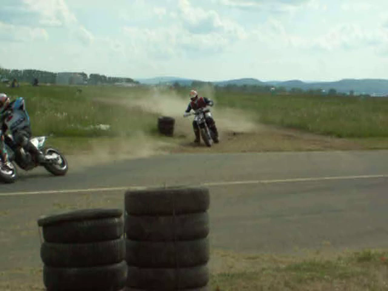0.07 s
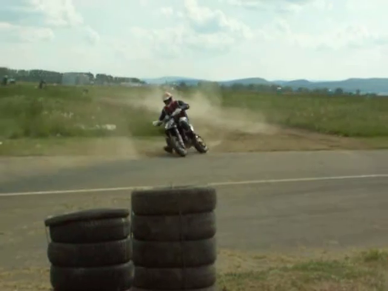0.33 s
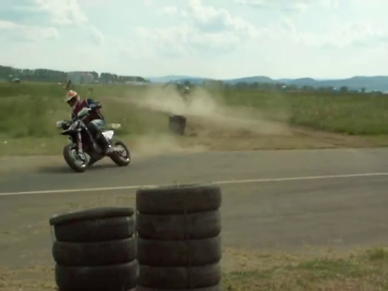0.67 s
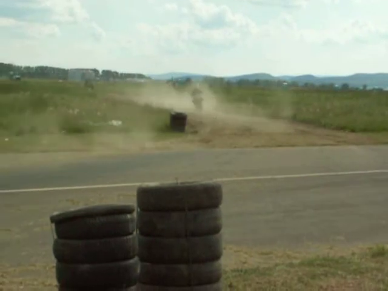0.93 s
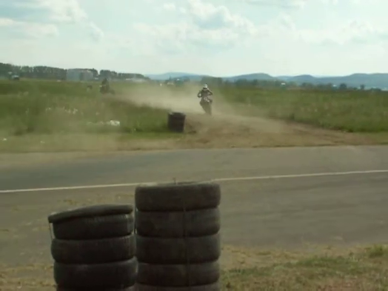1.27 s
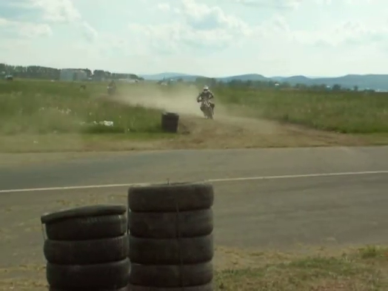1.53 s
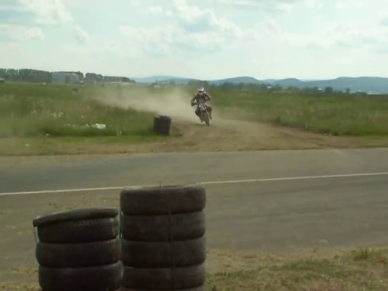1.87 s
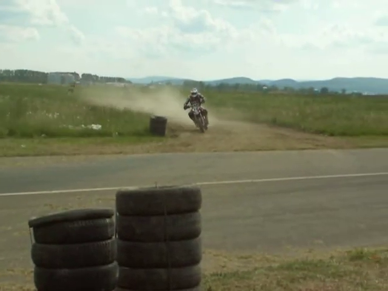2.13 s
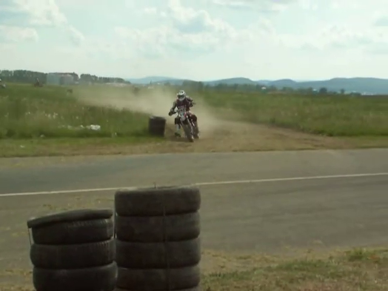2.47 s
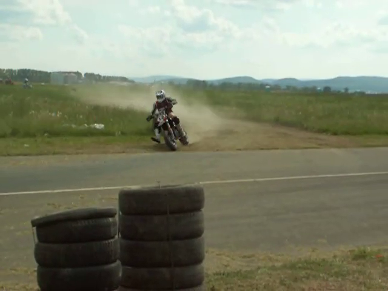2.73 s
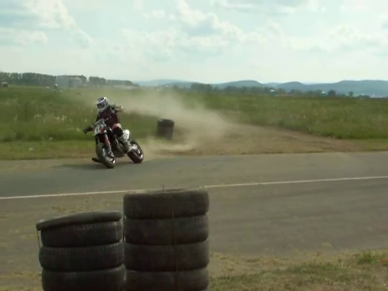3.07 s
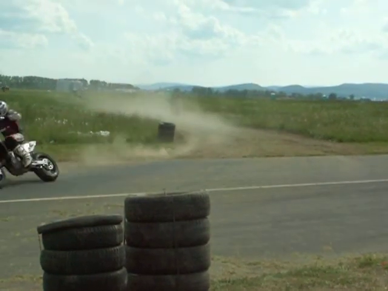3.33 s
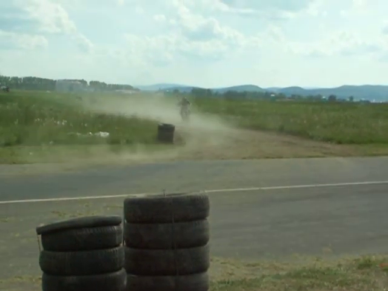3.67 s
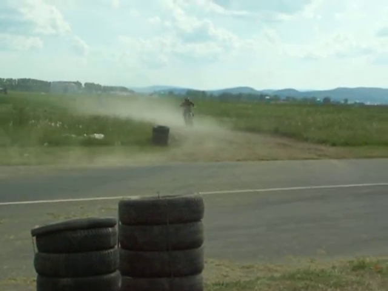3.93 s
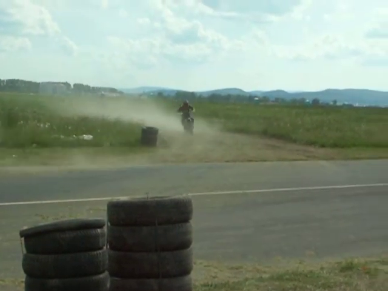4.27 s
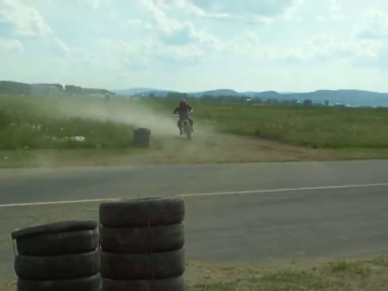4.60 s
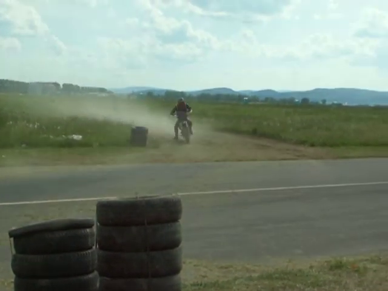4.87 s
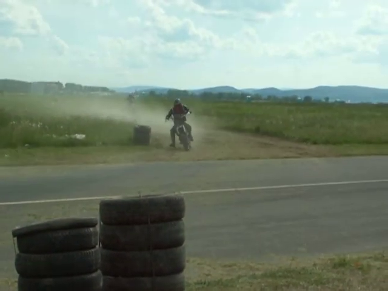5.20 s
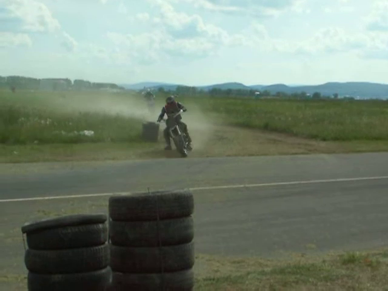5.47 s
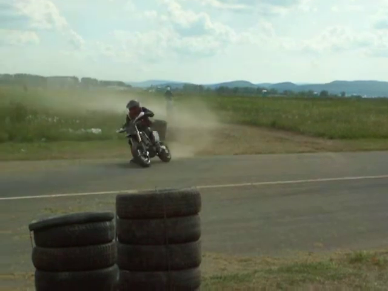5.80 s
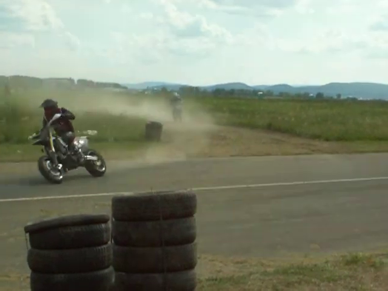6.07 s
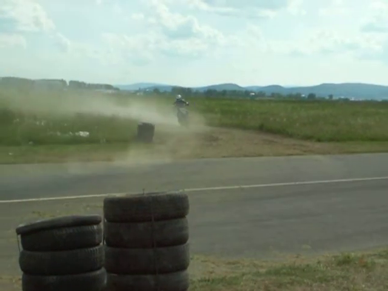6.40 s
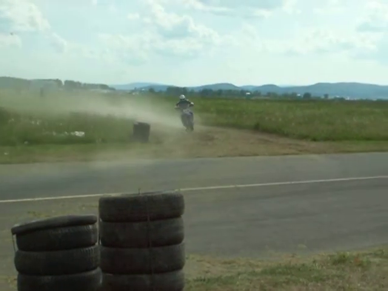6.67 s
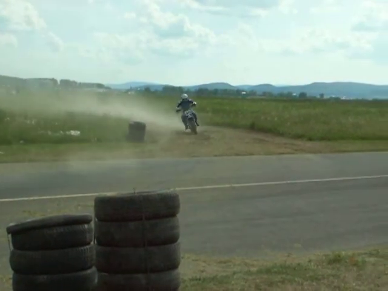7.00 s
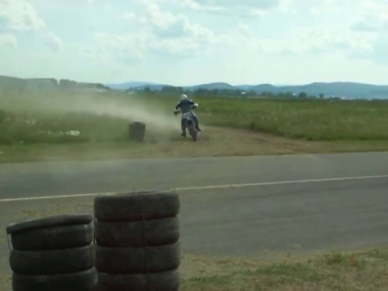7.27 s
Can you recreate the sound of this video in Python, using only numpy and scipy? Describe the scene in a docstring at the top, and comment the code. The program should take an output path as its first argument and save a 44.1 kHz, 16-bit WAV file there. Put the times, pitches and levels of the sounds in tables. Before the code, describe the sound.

Outdoors beside a track, two loud motorcycles accelerate past in quick succession and pull away. A third coasts into the bend with uneven popping, sharp exhaust bangs and brief, faint tyre squeals, then revs off. A fourth follows with a rapid volley of backfires before accelerating hard. Tyres rustle over grit throughout, all heard through a small, close microphone with muffled treble and slight distortion.

```python
"""Trackside at a bend after a dirt section, on a small camera's microphone close to the passing bikes.
Four single-cylinder four-stroke motorcycles come off the dirt, burble round and accelerate away.
Under throttle each firing booms in the pipe, barks and rings the silencer; off throttle the engines
pop unevenly and unburnt fuel bangs. Tyres squeal in the bend and grit hisses under them.
The microphone overloads a little and keeps almost nothing above 4 kHz."""
import sys
import numpy as np
from scipy import signal
from scipy.fft import rfft, irfft
from scipy.io import wavfile

SR = 44100
rng = np.random.default_rng(int(sys.argv[2]) if len(sys.argv) > 2 else 0)


def store_pcm(level_fs):
    """Save levels as 16-bit WAV."""
    pcm = np.round(np.clip(level_fs, -1, 1) * 32767).astype(np.int16)
    wavfile.write(sys.argv[1], SR, np.atleast_2d(pcm).T)


N = 332073
T = np.arange(N) / SR

# when each bike is nearest the microphone: t/s
NEAREST_S = [.14, .99, 3.45, 6.27]
# spectrum of tyres on grit: f/Hz, level/dB
GRIT_SPECTRUM = [(25,-18),(55,-6.5),(120,0.5),(300,9.5),(600,0.5),(1000,2.5),(1500,-2.5),(2800,-8.5),(3500,-6.5),(4300,-12)]
# tyre squeals: start t/s, length t/s, pitch f/Hz, level/dB
TYRE_SQUEALS = [(2.508,0.27,908,-25),(2.848,.38,874,-25),(6.17,.25,925,-26)]
# throttle shut for the bend or a gear change:
# shut t/s, pick-up t/s, driving again t/s, starting firing rate f/Hz, sag/(Hz/s), mid-coast level/dB
THROTTLE_OFF = [(.1,0.191,0.38,47.9,14,-36),(1.319,1.499,1.533,90.17,35,-20.5),(2.179,3.118,3.38,70,41,-22),(4.68,5.622,5.98,71.3,28,-20.5),(6.724,6.87,6.75,74.1,90,-16)]
# spectrum of a pop through the silencer: f/Hz, level/dB
POP_SPECTRUM = [(25,-30.5),(60,-13.5),(100,-2),(150,0.5),(300,0.5),(450,-4),(700,-9.5),(1200,-22.5),(2000,-19),(3000,-36),(4200,-42.5)]
# loud bangs of unburnt fuel: t/s, level/dB
FUEL_BANGS = [(2.525,-8),(2.604,2.5),(2.745,-9.5),(2.961,-14),(3.111,-12),(3.174,-11.5),(3.276,-7.5),(4.702,-5.5),(4.932,-12.5),(5.427,-4.5),(5.917,-11.5)]
# spectrum of a bang at the mouth of the pipe: f/Hz, level/dB
BANG_SPECTRUM = [(30,-27),(90,-7),(170,2),(400,0),(800,-5),(1700,-11),(2600,-18),(4200,-27)]
# the pipe's standing waves heard from the side: f/(main resonance), level/dB
PIPE_SIDE = [(.42,-29.5),(.58,-31.5),(.7,-22),(.84,-22.5),(.97,-15),(1.1,-21),(1.3,-22.5),(1.7,-36.5)]
# and from behind: f/Hz, level/dB
PIPE_REAR = [(100,-26),(147,-20.5),(165,-20),(215,-25.5),(245,-18),(298,-30),(345,-27.5),(380,-19),(420,-27)]
# spectra of the exhaust's bark and hiss: f/Hz, level/dB
BARK_SPECTRUM = [(100,-38.5),(340,-12.5),(450,8.5),(560,12.5),(700,1),(850,2),(1100,-1.5),(1350,2.5),(1700,2.5),(2400,-8),(4300,-56.5)]
HISS_SPECTRUM = [(100,-36),(900,-27),(1800,-14.5),(2600,6),(3050,-3.5),(3550,3.5),(3900,-6),(4300,-8)]
# each bike under throttle: t/s, firing rate f/Hz, exhaust level/dB re full drive
# a sudden fall in rate is a gear change
DRIVE_1 = [(.08,69.5,-16),(.32,73.6,-10.5),(.46,77.7,-5),(.6,81.4,-3.5),(.72,83,0),(.85,88,-0.5),(1.07,80,-1.5),(1.3,84,-9)]
DRIVE_2 = [(.88,71.9,-16),(1.05,77.64,-19),(1.2,82.76,-1),(1.48,89.26,1),(1.57,73.82,2.5),(1.84,76.08,1.5),(2.19,81.08,-6),(2.3,69.8,-22.5),(2.55,58,-33.5)]
DRIVE_3 = [(3.17,46.49,-33),(3.32,54.03,-21.5),(3.5,60.52,-6.5),(3.8,65.73,-2),(4.1,69.3,0),(4.4,73.22,0.5),(4.68,75.82,-5),(4.79,73.2,-18)]
DRIVE_4 = [(5.6,48.33,-22.5),(5.94,54.93,-15),(6.22,63.67,-7),(6.5,72.2,-3),(6.7,79.2,1),(6.81,62.28,-11),(6.9,64.74,-0.5),(7.16,70.98,3),(7.62,77.14,-5.5)]


def undb(db):
    """Decibels to gain."""
    return 10 ** (np.asarray(db) / 20)


def unit(x):
    """Scale to rms 1."""
    return x / np.sqrt(np.mean(x ** 2))


def envelope(start_s, end_s, attack_s, release_s):
    """Rise from the start, hold, and fall to nothing at the end."""
    return np.clip(np.minimum((T - start_s) / attack_s, (end_s - T) / release_s), 0, 1)


def wander(rate_hz):
    """Random drift with a spread near 1."""
    return np.interp(T * rate_hz, np.arange(4096), rng.standard_normal(4096))


def colour(x, spectrum, size=4096):
    """Minimum-phase filter from a table of f/Hz, level/dB."""
    hz, db = np.transpose(spectrum)
    bins_hz = np.arange(size // 2 + 1) * SR / size
    gain = undb(np.interp(np.log(bins_hz + 1), np.log(hz), db))
    cepstrum = irfft(np.log(gain))
    cepstrum[1:size // 2] *= 2
    cepstrum[size // 2 + 1:] = 0
    return signal.oaconvolve(x, irfft(np.exp(rfft(cepstrum))))[:N]


def resonate(x, hz, width_hz):
    """One resonance, gain 1 at its centre."""
    return signal.lfilter(*signal.iirpeak(hz, hz / width_hz, fs=SR), x)


def clicks(times, sizes):
    """Impulses, each shared between its two nearest samples."""
    at = np.clip(times * SR, 0, N + 1)
    i = at.astype(int)
    early = np.bincount(i, sizes * (1 - at + i), N + 3)
    late = np.bincount(i + 1, sizes * (at - i), N + 3)
    return (early + late)[:N]


def firings(cycle, scatter_db, jitter_s, count=800):
    """One impulse per engine cycle, each a little off in time and size."""
    timing, strength = rng.standard_normal((count, 2)).T
    times = np.interp(np.arange(count), cycle, T, left=-1, right=T[-1] + 1) + jitter_s * timing
    return clicks(times, undb(scatter_db * np.clip(strength, -2, 1.5)) * (times > 0))


def puffs(pulses, decay_s):
    """Turbulent gas that dies away after each impulse."""
    flow = signal.lfilter([1], [1, -np.exp(-1 / (decay_s * SR))], pulses)
    return unit(flow * rng.standard_normal(N))


def ground(x, lag_s, drift, share):
    """Add the reflection off the ground; its lag drifts as the bike moves and bounces."""
    lag = lag_s * (1 + drift * wander(4))
    return x + share * np.interp(T - lag, T, x)


def grit(circuit_db=-27, passing_db=-21.5, attack_s=.3, hold_s=.88, release_s=.55):
    """Tyres roll over grit: a fluttering bed from the whole circuit that swells with each pass."""
    passes = [envelope(s - attack_s, s + hold_s + release_s, attack_s, release_s) for s in NEAREST_S]
    gain = np.hypot(undb(circuit_db), undb(passing_db) * np.max(passes, axis=0))
    return gain * undb(1.4 * wander(35)) * unit(colour(rng.standard_normal(N), GRIT_SPECTRUM))


def squeal(start_s, length_s, hz, db, droop=.051):
    """Rubber sticks and slips in the bend; the pitch droops as the tyre grips again."""
    progress = np.clip((T - start_s) / length_s, 0, 1)
    pitch_hz = hz * (1 - droop * progress ** 3) * (1 + .022 * wander(170))
    angle = 2 * np.pi * np.cumsum(pitch_hz) / SR
    sliding = envelope(start_s, start_s + length_s, attack_s=.076, release_s=.11)
    return sliding * undb(db + 4.4 * wander(60)) * (np.sin(angle) + .06 * np.sin(2 * angle))


def coasting(idle_hz=47.14, pickup_hz_per_s=23, swell_db=8.5):
    """Firing rate, gain and progress (0-1) of the coasts: revs sag towards idle, then pick up."""
    hz, gain, progress = np.full(N, idle_hz), np.zeros(N), np.zeros(N)
    for shut_s, pickup_s, drive_s, start_hz, sag, db in THROTTLE_OFF:
        elapsed = T - shut_s
        revs = np.maximum(start_hz - sag * elapsed, idle_hz)
        revs += pickup_hz_per_s * np.maximum(T - pickup_s, 0)
        hz = np.where(elapsed >= 0, revs, hz)
        progress = np.where(elapsed >= 0, np.minimum(elapsed / (drive_s - shut_s), 1), progress)
        approach = undb(db + swell_db * (progress - .5))  # louder as the bike comes nearer
        gain += approach * envelope(shut_s, drive_s + .05, attack_s=.05, release_s=.1)
    return hz, gain, progress


def overrun(lean_at=.58, side_db=-1.5):
    """Weak, uneven firings stir the pipe's resonances; the deepest fades as the bike turns side-on."""
    hz, gain, progress = coasting()
    cycle = np.cumsum(hz) / SR
    pulses = firings(cycle, scatter_db=3, jitter_s=.00035)
    gulps = firings(cycle + .4, scatter_db=2.5, jitter_s=.0005)
    gas = unit(pulses - .55 * gulps) + .68 * puffs(pulses, .011)
    side_on = np.clip((progress - lean_at) * 10 + .5, 0, 1)
    pipe = gas + .68 * resonate(gas, 235, 25) + .7 * resonate(gas, 322, 40)
    pipe += 2 * (1 - side_on) * resonate(gas, 164.5, 44) + .74 * side_on * resonate(gas, 800, 400)
    # unburnt fuel crackles in the header, far more unevenly than the firings
    sparks = firings(cycle, scatter_db=8, jitter_s=.0008)
    crackle = unit(resonate(puffs(sparks, .0018), 1900, 2400))
    return gain * undb(side_db * side_on) * (unit(colour(pipe, POP_SPECTRUM)) + undb(-24) * crackle)


def backfires(volley_s=5.49, volley_hz=49.1, count=11):
    """Fuel bangs in the exhaust, singly and in one volley at idling rate; a puff of gas trails each."""
    times, db = np.transpose(FUEL_BANGS)
    volley_db = -7.5 + 2.5 * rng.standard_normal(count)
    volley = clicks(volley_s + np.arange(count) / volley_hz, undb(volley_db))
    pulses = clicks(times, undb(db)) + volley
    bangs = colour(pulses + .75 * pulses.std() * puffs(pulses, .005), BANG_SPECTRUM)
    return bangs / np.abs(colour(signal.unit_impulse(N), BANG_SPECTRUM)).max()


def pipe_level(hz, pipe_hz, away):
    """Level/dB of the pipe's standing waves as the bike turns from side-on (0) to tail-on (1)."""
    side = np.interp(hz / pipe_hz, *np.transpose(PIPE_SIDE))
    rear = np.interp(hz, *np.transpose(PIPE_REAR))
    return (1 - away) * side + away * rear


def pipe_boom(cycle, overtones_db, lead_cycles=.19, waver_db=1.9):
    """Low standing waves of the pipe, locked to the firings; the fundamental radiates poorly."""
    angle = 2 * np.pi * (cycle + lead_cycles + .006 * wander(60))
    harmonics = enumerate([overtones_db[0] - 13.5, *overtones_db], 1)
    return -np.sqrt(2) * sum(undb(db + waver_db * wander(30)) * np.sin(k * angle) for k, db in harmonics)


def silencer_ring(strike, nearest_s, rear_hz, width_hz):
    """The silencer rings briefly after each crack, lower from the side than from behind."""
    side, rear = (unit(resonate(resonate(strike, hz, width_hz), hz, 1.47 * width_hz))
                  for hz in (.83 * rear_hz, rear_hz))
    side = unit(ground(side, lag_s=.001464, drift=.12, share=.62))
    rear = unit(ground(rear, lag_s=.0016, drift=.25, share=.5))
    behind = np.clip((T - nearest_s) / .65, 0, 1) ** 2
    return np.sqrt(1 - behind ** 2) * side + behind * rear


def motorcycle(drive, nearest_s, turn_after_s, pipe_hz, ring_hz, ring_width_hz, rough, boom_slope,
               boom_db, tail_on_db, bark_db, ring_db, hiss_db, growl_db, clatter_db):
    """A bike passes under throttle: a sharp exhaust crack and a weaker intake gulp in every cycle."""
    times, *columns = np.transpose(drive)
    hz, drive_db = (np.interp(T, times, column) for column in columns)
    cycle = np.cumsum(hz * (1 + .003 * wander(20))) / SR
    crack = firings(cycle, scatter_db=.9, jitter_s=.00004)
    gulp = firings(cycle + .39, scatter_db=2, jitter_s=.00008)
    pulses = crack + .58 * gulp
    gas = puffs(pulses, .0035)

    bark = colour(unit(pulses) + .5 * rough * gas, BARK_SPECTRUM)
    bark = unit(ground(bark, lag_s=.002613, drift=.12, share=1))
    strike = unit(crack + .25 * gulp) + .8 * rough * puffs(pulses, .003)
    ring = silencer_ring(strike, nearest_s, ring_hz, ring_width_hz)
    hiss = unit(colour(.47 * unit(pulses) + gas, HISS_SPECTRUM)) * undb(1.1 * wander(45))
    growl = unit(resonate(resonate(unit(crack) + .22 * gas, 760, 450), 1200, 900))
    clatter = unit(resonate(puffs(pulses, .014), 3490, 330))

    # the tail swings towards the microphone in 0.37 s
    away = np.clip((T - nearest_s - turn_after_s) / .37 + .5, 0, 1)
    lift_db = boom_slope * drive_db + tail_on_db * away
    overtones_db = [pipe_level(k * hz, pipe_hz, away) + lift_db for k in range(2, 6)]
    sound = undb(boom_db) * pipe_boom(cycle, overtones_db)
    sound += undb(drive_db + ring_db) * ring
    sound += undb(.66 * drive_db) * (undb(bark_db) * bark + undb(hiss_db) * hiss)
    # the engine itself is heard only close to the microphone
    near = 1 / (1 + ((T - nearest_s) / .18) ** 2)
    sound += near * (undb(growl_db) * growl + undb(clatter_db) * clatter)
    return sound * envelope(times[0], times[-1], attack_s=.07, release_s=.07)


def scene():
    """The four bikes in turn over the sounds of the bend, in mono."""
    bikes = motorcycle(DRIVE_1, NEAREST_S[0], turn_after_s=1.2, pipe_hz=242.3, ring_hz=1850,
                       ring_width_hz=1160, rough=.85, boom_slope=.23, boom_db=.5, tail_on_db=-3,
                       bark_db=-18, ring_db=-15.5, hiss_db=-20, growl_db=-27, clatter_db=-24)
    bikes += motorcycle(DRIVE_2, NEAREST_S[1], turn_after_s=.59, pipe_hz=253, ring_hz=2090,
                        ring_width_hz=920, rough=1, boom_slope=.6, boom_db=-2, tail_on_db=.5,
                        bark_db=-20.5, ring_db=-18, hiss_db=-24, growl_db=-23.5, clatter_db=-33.5)
    bikes += motorcycle(DRIVE_3, NEAREST_S[2], turn_after_s=.73, pipe_hz=273.6, ring_hz=2000,
                        ring_width_hz=880, rough=.9, boom_slope=.64, boom_db=-2, tail_on_db=1.5,
                        bark_db=-19.5, ring_db=-17.5, hiss_db=-21, growl_db=-22, clatter_db=-28)
    bikes += motorcycle(DRIVE_4, NEAREST_S[3], turn_after_s=.9, pipe_hz=311, ring_hz=2130,
                        ring_width_hz=1090, rough=1, boom_slope=.52, boom_db=-.5, tail_on_db=-.5,
                        bark_db=-20, ring_db=-19.5, hiss_db=-22.5, growl_db=-28.5, clatter_db=-29.5)
    return (bikes + overrun() + backfires() + sum(squeal(*row) for row in TYRE_SQUEALS) + grit())[None]


def record(dry):
    """The camera starts abruptly, flattens loud peaks, cuts the treble and clips what overshoots."""
    start_s, ceiling, full_scale = .187, .64, .69
    driven = dry * undb(1) * (T >= start_s)
    squashed = driven / (1 + (driven / ceiling) ** 4) ** (1 / 4)
    dulled = signal.sosfilt(signal.butter(6, 3800, fs=SR, output="sos"), squashed)
    narrow = signal.sosfiltfilt(signal.butter(14, 4130, fs=SR, output="sos"), dulled)
    clipped = np.clip(narrow, -full_scale, full_scale)
    return signal.sosfilt(signal.ellip(8, .2, 70, 15900, fs=SR, output="sos"), clipped)


dry = scene()
out = record(dry)
store_pcm(out)
```